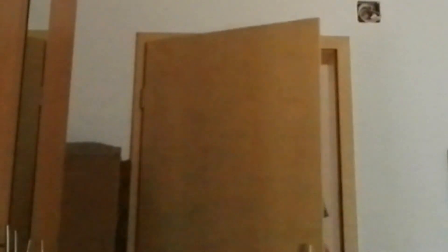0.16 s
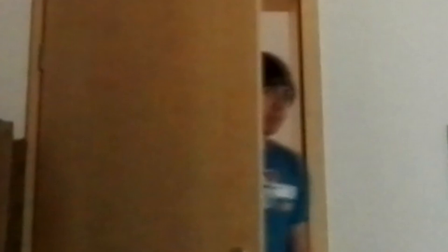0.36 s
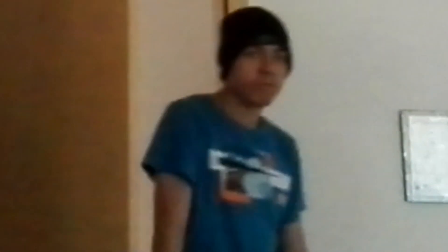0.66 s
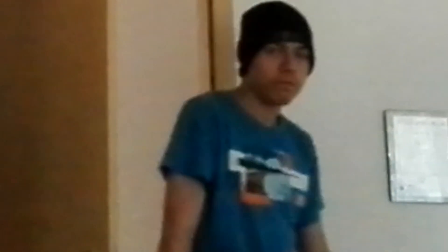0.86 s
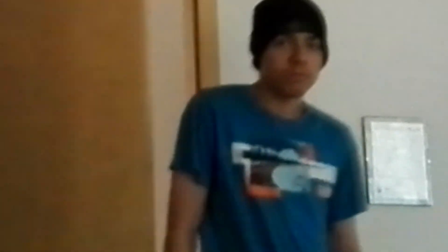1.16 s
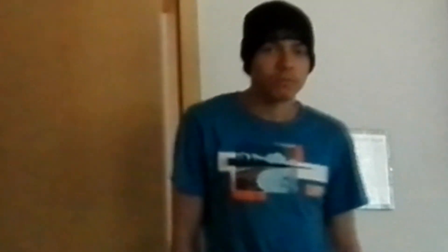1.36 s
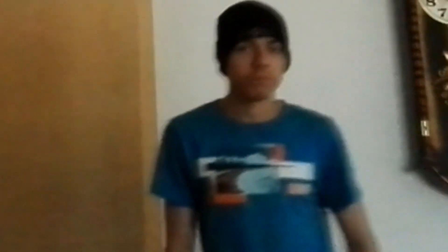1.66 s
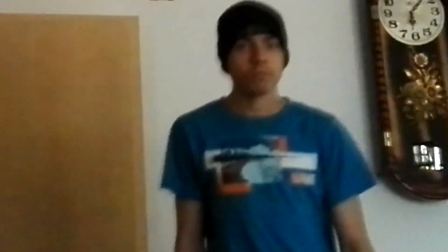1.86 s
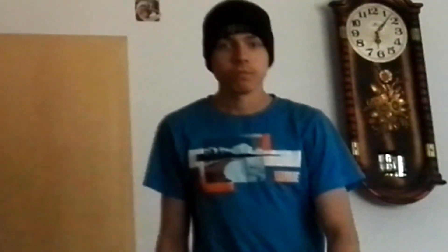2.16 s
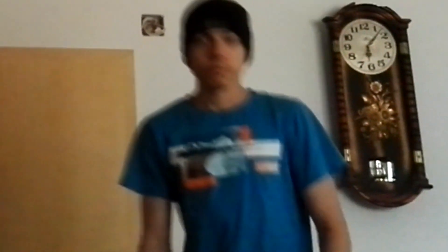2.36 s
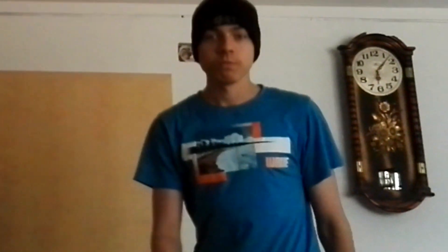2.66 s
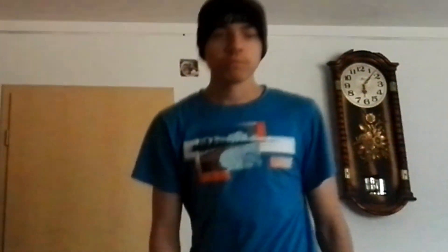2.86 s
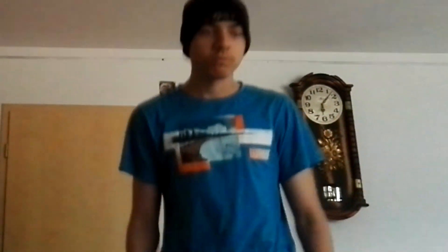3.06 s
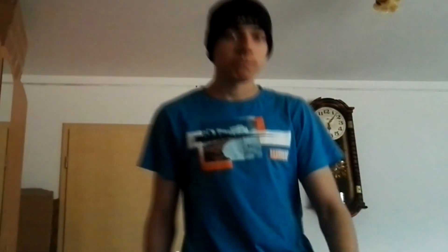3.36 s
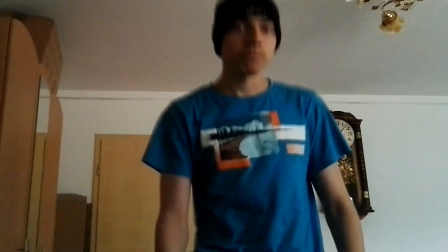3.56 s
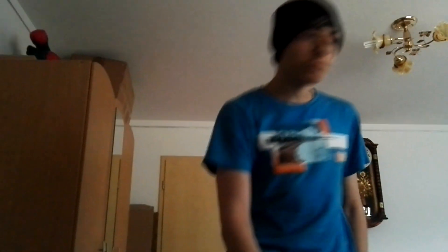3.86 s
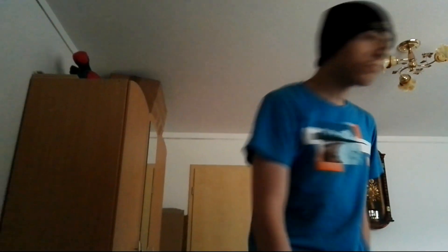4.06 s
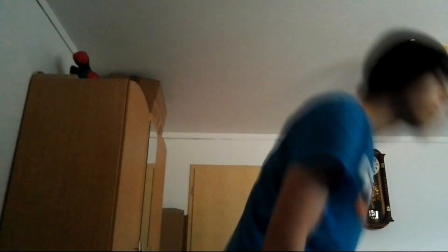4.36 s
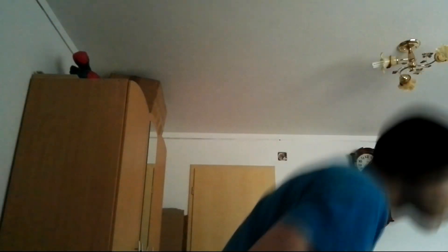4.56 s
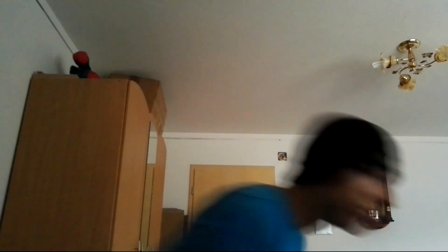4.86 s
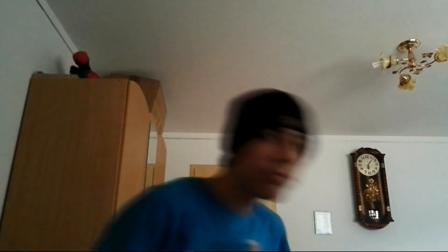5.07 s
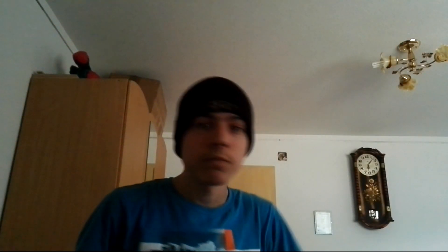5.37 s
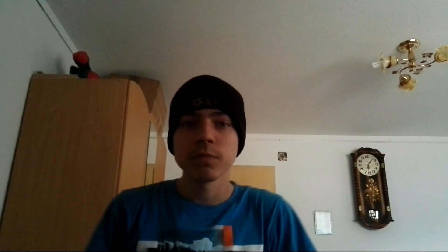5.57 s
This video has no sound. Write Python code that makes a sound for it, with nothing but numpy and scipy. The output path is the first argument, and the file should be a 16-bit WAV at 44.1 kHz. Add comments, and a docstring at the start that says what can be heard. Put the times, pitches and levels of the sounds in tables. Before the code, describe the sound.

A small, fairly live room is heard through a pair of small microphones with low hiss. A faint footfall starts it; at 0.25 s there is a short bright brush as the door opens, a light wood tap at 0.35 s and a firmer step with a bump near 0.5 s. Cloth rustles and soft scuffs follow from 0.8 to 1.7 s. From about 1 s a tiny dry tick repeats about twice a second on the left. At 2.1 s the door slams: a bright latch crack with a brief metal ring, then a loud wooden bang and deep boom, shuddering and fading over about a second. Rustle and a scuff come at 2.7 s, a small tap at 3.4 s, a dull furniture knock at 3.8 s and a harder one at 4.4 s. Around 4.6 s low bumps and steps cluster with cloth movement, and scattered taps and rustling continue to about 5.7 s.

```python
"""In a small room, a wooden door is swung and slams: its latch snaps, the leaf booms in its frame and shudders.
Someone walks about with rustling clothes, taps and bumps wood, and knocks twice against furniture.
Contacts are coloured noise with early echoes and a room tail; damped sines ring for wood, metal and floor.
Cloth is swelling noise. A spaced pair of small microphones adds hiss, and a faint regular tick on the left.
"""
import sys
import numpy as np
from scipy import signal
from scipy.fft import rfft, irfft, next_fast_len
from scipy.io import wavfile
from scipy.ndimage import uniform_filter1d

SR = 44100
rng = np.random.default_rng(int(sys.argv[2]) if len(sys.argv) > 2 else 0)


def generate_wav(signal):
    """Clip the signal to [-1, 1] and save it as 16-bit WAV at the path in sys.argv[1]."""
    frames = np.transpose(np.atleast_2d(signal))
    scaled = np.clip(frames, -1, 1) * 32767
    pcm = np.round(scaled).astype(np.int16)
    wavfile.write(sys.argv[1], SR, pcm)


N = 252526  # samples in the scene
BINS = np.fft.rfftfreq(SR, 1 / SR)  # frequencies [Hz] of a one-second sound

# likeness of the two microphones: (frequency [Hz], left-right coherence [-1 to 1])
LIKENESS = [(60, 0.99), (130, 0.96), (290, 0.8), (630, 0.58), (1300, -0.4), (2200, 0.067), (14000, -0.025)]
# spectrum of a thud through the floor or wood: (frequency [Hz], relative density [dB per Hz])
THUD = [(20, 0), (40, -12), (60, 5.5), (90, -8), (130, 2.5), (220, 0.5), (330, -6), (600, -14), (2000, -45)]
# spectrum of a scuffing sole, also the noisy edge of a tap: (frequency [Hz], relative density [dB per Hz])
SCUFF = [(100, -19.5), (500, -1.5), (2000, -3.5), (3200, -12), (6000, -23), (9000, -37), (14000, -30)]


def amp(db):
    """Decibels to gain."""
    return 10 ** (np.asarray(db) / 20)


def unit(x):
    """Scales to rms 1."""
    return x / np.sqrt(np.mean(abs(x) ** 2) + 1e-30)


def read(points, hz):
    """Reads a table on a logarithmic frequency axis."""
    f, value = np.transpose(points)
    return np.interp(np.log(hz + 1), np.log(f + 1), value)


def colour(points, hz=BINS):
    """A spectrum as gains of mean power 1, so only its shape counts."""
    return unit(amp(read(points, hz)))


def add(mix, s, sound):
    """Adds a sound to both channels at time s, cut off at the end of the mix."""
    part = mix[:, max(round(s * SR), 0):][:, :sound.shape[-1]]
    part += sound[..., :part.shape[1]]


def lumps(size, order):
    """Smooth chance of rms 1, changing about every `order` points."""
    smooth = uniform_filter1d(rng.standard_normal(size), order)
    return unit(uniform_filter1d(smooth, order))


def causal(gain):
    """Gives a spectrum the minimum phase of a body that rings only after it is struck."""
    log_gain = np.log(np.maximum(gain, 1e-5))
    mirrored = np.concatenate([log_gain, log_gain[-2:0:-1]])
    phase = -signal.hilbert(mirrored).imag
    return gain * np.exp(1j * phase[:len(gain)])


def diffuse(gain, size):
    """Coloured noise from all sides: alike at both microphones in the bass, nearly unrelated in the high treble."""
    hz = np.fft.rfftfreq(size, 1 / SR)
    left, other = np.exp(2j * np.pi * rng.random((2, len(hz))))
    same = np.clip(read(LIKENESS, hz), -1, 1)
    right = same * left + np.sqrt(1 - same ** 2) * other
    return irfft(np.array([left, right]) * gain, size) * np.sqrt(size)


def steady(points):
    """Lasting noise of rms 1 with the given spectrum."""
    size = next_fast_len(N, True)
    return diffuse(colour(points, np.fft.rfftfreq(size, 1 / SR)), size)[:, :N]


def blow(gain, rise, hold=0., length=0.95, early_s=0.028, direct=4.9):
    """One contact: direct sound, uneven early echoes, then a tail that dies band by band (rise, hold in s)."""
    # decay of the room, which `length` stretches: (frequency [Hz], t60 at length 1 [s])
    room_decay = [(50, 0.65), (140, 0.52), (300, 0.52), (700, 0.47), (2000, 0.39), (5000, 0.43),
                  (8000, 0.43), (14000, 0.33)]
    clatter_db, grain_db = 4.5, 3.2
    after = np.arange(SR) / SR  # a second after the blow
    uneven = clatter_db * np.exp(-after / early_s)
    early = amp(uneven * lumps(SR, order=40))
    early = early / np.exp(np.log(amp(uneven)) ** 2)  # keeps the mean power
    echoes = diffuse(1.0, SR) * early * (1 - np.exp(-after / max(rise, 1e-4)))
    echoes[:, 0] += direct * np.exp(-rise / 0.0042)  # the harder the contact, the stronger its click

    hz, t, bands = signal.stft(echoes, SR, nperseg=512)
    t60 = length * read(room_decay, hz)[:, None]
    bands = bands * amp(-60 * np.maximum(t - hold, 0) / t60)
    tail = signal.istft(bands, SR, nperseg=512)[1][:, :SR]

    # many small resonances, more uneven towards the treble
    crowd = unit(amp(grain_db * lumps(len(BINS), order=60) * BINS / (BINS + 800)))
    return irfft(rfft(tail) * causal(gain * crowd), SR)


def ring(modes, rise, size=SR):
    """Damped modes; the less alike the microphones are at a pitch, the further apart its two phases."""
    t, out = np.arange(size) / SR, 0
    for hz, db, t60 in modes:
        apart = np.arccos(np.clip(read(LIKENESS, hz), -1, 1)) * np.array([[.5], [-.5]])
        out = out + amp(db - 60 * t / t60) * np.sin(2 * np.pi * hz * t + apart)
    return out * (1 - np.exp(-t / max(rise, 1e-4)))


def hiss():
    """Quiet hiss of the microphones: steady noise, strongest in the bass."""
    # (frequency [Hz], relative density [dB per Hz])
    hiss_spectrum = [(15, -28), (25, 1), (48, 0.5), (87, -4), (140, -4.5), (202, -9.5), (940, -11),
                     (1290, -14.5), (1400, -15), (1510, -19), (1970, -16.5), (3350, -22.5), (4990, -22),
                     (11000, -25.5), (14000, -22.5)]
    return amp(-63.5) * steady(hiss_spectrum)


def steps(ring_db=4.5, ring_t60=0.46, ring_rise=0.028, body_db=-5, thud_rise=0.0026, thud_hold=0.027,
          scuff_rise=0.0019, scuff_hold=0.014, scuff_length=0.79):
    """Each step thuds through the floor, exciting its modes, while the sole scuffs over it."""
    # footsteps: (time [s], reference level of thud and floor ring [dB], level of scuff [dB])
    footfalls = [(0.0, -55, -67), (0.478, -39.5, -54), (1.222, -66, -59), (1.683, -60.5, -57),
                 (2.698, -69, -53.5), (3.522, -57.5, -54.5), (4.075, -66, -84), (4.344, -51, -61.5),
                 (4.498, -51, -50.5), (4.603, -43.5, -60.5), (4.743, -50, -67), (5.158, -55.5, -78),
                 (5.385, -56.5, -64.5), (5.471, -53, -56)]
    # deep modes under every thud: (frequency [Hz], level relative to the thud reference [dB], t60 [s])
    floor_modes = [(41, -4.5, 0.65), (59, -26, 0.49)]
    threshold_s = 1.0  # the walker crosses the threshold and the floor changes pitch
    doorway_hz, indoors_hz = 120.3, 137.9
    out = np.zeros((2, N))
    for s, thud_db, scuff_db in footfalls:
        hz = doorway_hz if s < threshold_s else indoors_hz
        modes = [*floor_modes, (hz, ring_db, ring_t60)]
        add(out, s, amp(thud_db) * ring(modes, ring_rise))
        add(out, s, amp(thud_db + body_db) * blow(colour(THUD), thud_rise, thud_hold))
        add(out, s, amp(scuff_db) * blow(colour(SCUFF), scuff_rise, scuff_hold, scuff_length))
    return out


def brush(db=-59):
    """A short, bright brushing sound as the door starts to open: one contact of treble noise."""
    # (frequency [Hz], relative density [dB per Hz])
    brush_spectrum = [(1000, 4.5), (4000, 5), (6000, 6), (10000, -1), (14000, -8)]
    out = np.zeros((2, N))
    add(out, 0.245, amp(db) * blow(colour(brush_spectrum), rise=0.0015, hold=0.037, length=1.0))
    return out


def taps(octaves=0.29, skirt=1.06, body_db=-10, hold=0.0034, length=0.82, ring_db=-2, ring_t60=0.15,
         ring_rise=0.0018):
    """Each tap or bump rings one broad resonance of the wood, with added edge noise and a little thud."""
    # (time [s], pitch [Hz], reference level [dB], noisy edge relative to the resonance [dB])
    wood_taps = [(0.350, 1130, -48.5, -1), (0.478, 257, -51.5, -15), (0.822, 950, -53.5, -5),
                 (1.575, 1300, -63, -5), (3.372, 368, -55.5, -10), (4.603, 268, -50, -22),
                 (4.648, 280, -42, -11.5), (4.811, 326, -55.5, -13), (5.066, 1084, -48, -26),
                 (5.156, 364, -56.5, -12), (5.474, 983, -49.5, -12.5), (5.553, 361, -50, -11),
                 (5.659, 380, -59.5, -7)]
    rise_s, rise_hz = 0.00091, 1000  # rise at this pitch; lower taps are softer and rise more slowly
    out = np.zeros((2, N))
    for s, hz, db, edge_db in wood_taps:
        distance = np.log2((BINS + 1) / hz) / octaves
        resonance = unit(1 / (1 + distance ** 2) ** skirt)
        edge = amp(edge_db) * colour(SCUFF)
        body = amp(body_db) * colour(THUD)
        gain = np.sqrt(resonance ** 2 + edge ** 2 + body ** 2)
        add(out, s, amp(db) * blow(gain, rise_s * rise_hz / hz, hold, length))
        add(out, s, amp(db) * ring([(hz, ring_db, ring_t60)], ring_rise))
    return out


def clothes(db=7.0, grain_db=0.5):
    """Cloth rubs with a slightly grainy hiss: each move of the body swells, holds and dies away."""
    # rubs: (time [s], time from onset to fading [s], level before the common gain `db` [dB])
    rubs = [(0.875, .13, -66.5), (1.195, 0.052, -72.5), (1.555, 0.22, -68.5), (2.7, 0.092, -64.5),
            (2.844, 0.14, -72.5), (3.307, 0.29, -72), (3.93, 0.26, -73.5), (4.608, 0.089, -64.5),
            (4.784, 0.38, -70), (5.435, 0.31, -69.5)]
    # (frequency [Hz], relative density [dB per Hz])
    cloth_spectrum = [(200, 4), (900, 6), (2000, -1.5), (3300, -1), (5500, -2.5), (7500, -4),
                      (10000, -10.5), (14000, -9.5)]
    attack_s, release_s = 0.026, 0.071
    t, level = np.arange(N) / SR, 0
    for s, hold, rub_db in rubs:
        swell = np.clip((t - s) / attack_s, 0, 1)
        fade = np.exp(-np.maximum(t - s - hold, 0) / release_s)
        level = level + amp(rub_db) * swell * fade
    grain = unit(uniform_filter1d(rng.standard_normal(N), 300))
    return amp(db + grain_db * grain) * level * steady(cloth_spectrum)


def ticks():
    """A tiny dry electrical pulse, thinned by a high-pass, repeats in the left channel."""
    first_s, every_s = 1.0413, .5308
    db, seconds = -39.5, .00036
    t = np.arange(N) / SR - first_s
    pulse = (t > 0) * (t % every_s < seconds)
    thin = signal.lfilter(*signal.butter(1, 150, "high", fs=SR), pulse)
    return np.array([[-1], [0]]) * amp(db) * thin


def draught(db=-46):
    """Air squeezed ahead of the swinging leaf gives one soft, deep puff."""
    start_s, seconds, hz = 2.038, .055, 32
    t = np.arange(int(seconds * SR)) / SR
    return start_s, amp(db) * np.sin(np.pi * t / seconds) * np.sin(2 * np.pi * hz * t)


def latch():
    """The latch hits with a bright crack, a short metal ring starts, and it rattles on: noisy contacts."""
    # hits and rattles: (time [s], level [dB])
    clatter = [(2.1042, -25.5), (2.117, -29), (2.1349, -34.5), (2.159, -49)]
    # spectrum of the hits: (frequency [Hz], relative density [dB per Hz])
    latch_spectrum = [(88, -27), (150, 0), (566, -4.5), (685, -18), (876, 4.5), (1040, -9), (1230, 1.5),
                      (1580, -13), (3010, -8.5), (3250, -8.5), (5220, -5), (5630, -11), (14000, -35)]
    # spectrum of metal on metal: (frequency [Hz], relative density [dB per Hz])
    snap_spectrum = [(1500, -17), (3400, -17.5), (5200, -0.5), (7800, -5), (10000, -15.5), (14000, -10.5)]
    # ring of the metal: (frequency [Hz], level [dB], t60 [s])
    metal_modes = [(2030, -50, .25), (3660, -30.5, 0.18), (4630, -48, 0.48), (5709, -61, .2),
                   (5841, -49, .2), (6000, -44, .18), (7892, -64, .14)]
    out = np.zeros((2, N))
    for s, db in clatter:
        add(out, s, amp(db) * blow(colour(latch_spectrum), rise=0.0016, length=0.55))
    add(out, 2.105, amp(-32) * blow(colour(snap_spectrum), rise=0.0024, hold=0.048, length=0.61))
    add(out, 2.116, ring(metal_modes, rise=.002))  # the metal rings
    return out


def leaf():
    """The leaf hits the frame: a noisy bang, the ring of wood and room, and a deep boom."""
    # spectrum of the bang: (frequency [Hz], relative density [dB per Hz])
    leaf_spectrum = [(76, -13), (130, -1), (192, -2.5), (296, -8), (599, -14), (700, -13.5), (787, -16.5),
                     (1140, -17), (1310, -20.5), (2140, -20.5), (3220, -25.5), (3700, -25.5), (5920, -26.5),
                     (10200, -42.5), (14000, -38)]
    # ring of the wood and the room: (frequency [Hz], level [dB], t60 [s])
    wood_modes = [(101.5, -27, 0.55), (128.4, -37.5, 1.28), (173.7, -30, 0.72), (185.2, -31.5, 0.7),
                  (198.8, -22, 0.39), (252.7, -35, 0.79), (329, -32.5, 0.76), (378, -34, 0.53),
                  (499, -39, 0.67), (605.4, -31.5, 0.41), (800, -33.5, 0.34), (932, -36, 0.36),
                  (1047, -40, 0.42), (1081, -41, 0.38)]
    # deep modes of the leaf and the air that it pushes: (frequency [Hz], level [dB], t60 [s])
    boom_modes = [(37.1, -24, 1.35), (38.43, -6.5, 0.49), (46.6, -6.5, 0.25), (50.6, -12.5, 0.45),
                  (68.5, -27.5, 0.85)]
    hit_s = 2.130
    out = np.zeros((2, N))
    add(out, hit_s, amp(-23.0) * blow(colour(leaf_spectrum), rise=0.0029, hold=0.027, length=1.034))
    add(out, hit_s, ring(wood_modes, rise=0.024))
    add(out, hit_s, ring(boom_modes, rise=0.039, size=2 * SR))
    return out


def settle(seconds=0.105, from_hz=52, to_hz=94, db=-35):
    """The leaf bounces against the latch, faster and faster: a deep tone that glides up, swells and fades."""
    u = np.linspace(0, 1, int(seconds * SR))
    phase = 2 * np.pi * np.cumsum(from_hz + (to_hz - from_hz) * u) / SR
    return amp(db) * np.sin(np.pi * u) * np.sin(phase)


def shudder():
    """The leaf shudders late in its frame: one soft contact of mostly low noise."""
    # (frequency [Hz], relative density [dB per Hz])
    shudder_spectrum = [(65, -40), (110, -2), (342, -11), (437, -23), (535, -13), (669, -21.5), (1090, -22),
                        (1330, -32), (1600, -29), (14000, -51)]
    return amp(-44.5) * blow(colour(shudder_spectrum), rise=0.0089, hold=0.063, length=0.99)


def sway(seconds=0.26, hz=35.4, db=-43):
    """The latched leaf sways once more in its frame: a deep tone under a single swell."""
    t = np.arange(int(seconds * SR)) / SR
    return amp(db) * np.sin(np.pi * t / seconds) * np.sin(2 * np.pi * hz * t)


def door():
    """The slam: puff of air, latch, bang of the leaf, bounce, shudder and sway."""
    out = latch() + leaf()
    add(out, *draught())
    add(out, 2.325, settle())
    add(out, 2.368, shudder())
    add(out, 2.427, sway())
    return out


def knocks():
    """Two knocks on furniture, one dull and one hard: each is a few quick contacts and a ring."""
    # contacts of the dull knock: (time [s], level [dB])
    dull_contacts = [(3.7959, -41), (3.804, -33.5), (3.810, -40)]
    # its spectrum: (frequency [Hz], relative density [dB per Hz])
    dull_spectrum = [(29, -43), (50, -14), (125, -13), (187, -11.5), (280, -5.5), (448, -13.5),
                     (516, -17.5), (669, -18.5), (2030, -18), (5080, -33), (8530, -42), (9830, -48),
                     (10600, -47), (14000, -41)]
    # its ring: (frequency [Hz], level [dB], t60 [s])
    dull_modes = [(38.4, -46, 0.63), (140, -42, 0.55), (192, -64, .3), (278.4, -30, 0.24),
                  (342.5, -29.5, 0.18), (431, -31.5, 0.079), (1114, -49, 0.42), (1450, -59, 0.098),
                  (2090, -53, 0.54)]
    # contacts of the hard knock: (time [s], level [dB])
    hard_contacts = [(4.3745, -40), (4.382, -39.5), (4.396, -41.5)]
    # its spectrum: (frequency [Hz], relative density [dB per Hz])
    hard_spectrum = [(29, -38), (50, 5), (163, -18), (211, 6), (273, -1), (417, -4), (470, -6), (541, -4),
                     (1320, -11), (2880, -9), (3480, -15), (4850, -13.5), (7950, -26), (14000, -32)]
    # its ring: (frequency [Hz], level [dB], t60 [s])
    hard_modes = [(35.9, -47.5, 1), (332, -47.5, 0.89), (420, -35.5, 0.18), (545, -27.5, 0.093),
                  (597, -28, 0.067), (754, -28, 0.049), (945, -36.5, 0.061), (2070, -37.5, 0.075)]
    out = np.zeros((2, N))
    for s, db in dull_contacts:
        add(out, s, amp(db) * blow(colour(dull_spectrum), rise=0.001, length=0.94))
    add(out, 3.8105, ring(dull_modes, rise=0.00096))
    for s, db in hard_contacts:
        add(out, s, amp(db) * blow(colour(hard_spectrum), rise=0.00029, length=0.98))
    add(out, 4.3745, ring(hard_modes, rise=0.0021))
    return out


def scene():
    """Everything in the room, over the quiet hiss."""
    return hiss() + steps() + brush() + taps() + clothes() + door() + knocks()


def record(dry):
    """The left microphone favours the midrange, both lose the deepest bass; then the tick and a steep band limit."""
    # balance of the pair: (frequency [Hz], left minus right [dB])
    pair_balance = [(60, 1.5), (200, 1.5), (370, 0.5), (690, 5.5), (1270, 3.5), (2330, 3), (4290, 0.5),
                    (7900, 0), (14000, -2)]
    low_hz, edge_hz = 24, 14450
    size = next_fast_len(N + SR // 4, True)
    hz = np.fft.rfftfreq(size, 1 / SR)
    lean = amp(read(pair_balance, hz) * np.array([[.5], [-.5]]))
    low_cut = 1 / np.sqrt(1 + (low_hz / (hz + 1)) ** 10)
    heard = irfft(rfft(dry, size) * lean * low_cut, size)[:, :N] + ticks()
    band_limit = signal.firwin(401, edge_hz, window=("kaiser", 9), fs=SR)
    return signal.oaconvolve(heard, band_limit[None], "same")


dry = scene()
out = record(dry)
generate_wav(out)
```